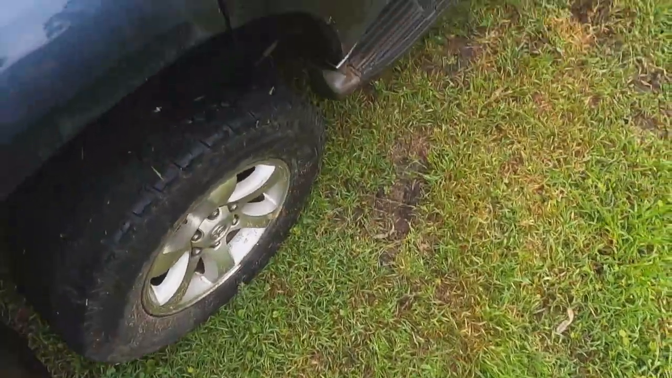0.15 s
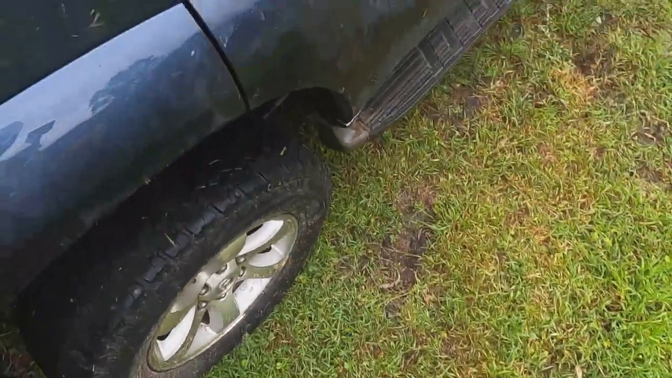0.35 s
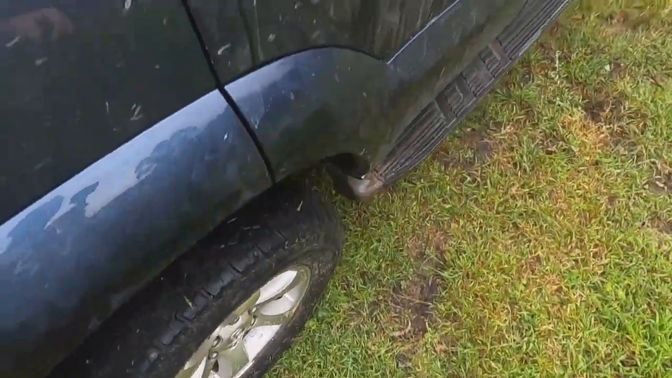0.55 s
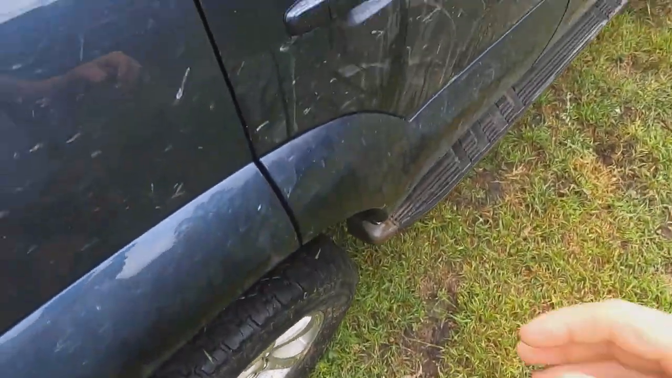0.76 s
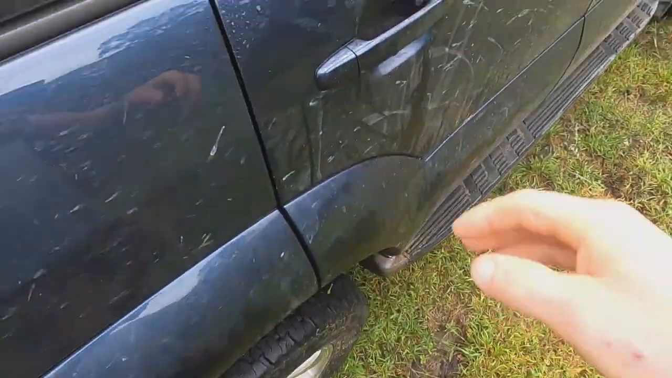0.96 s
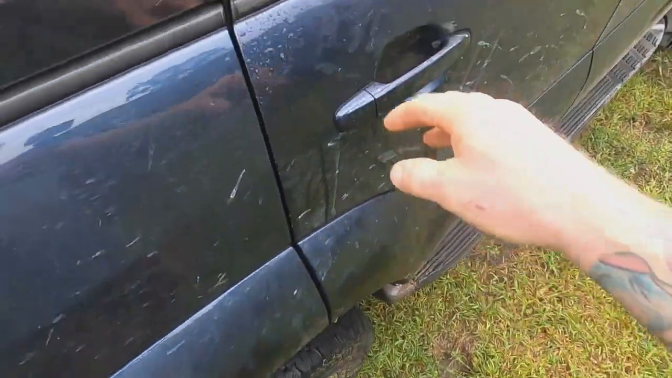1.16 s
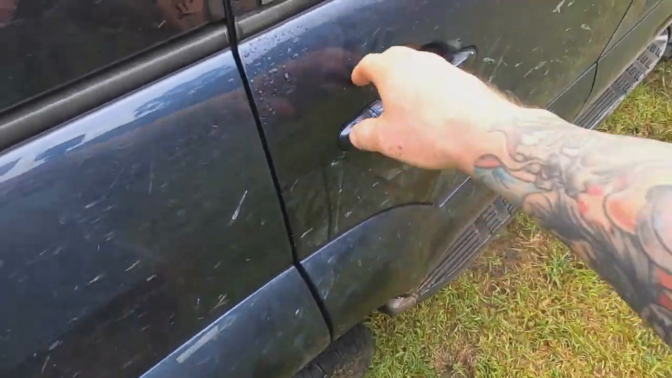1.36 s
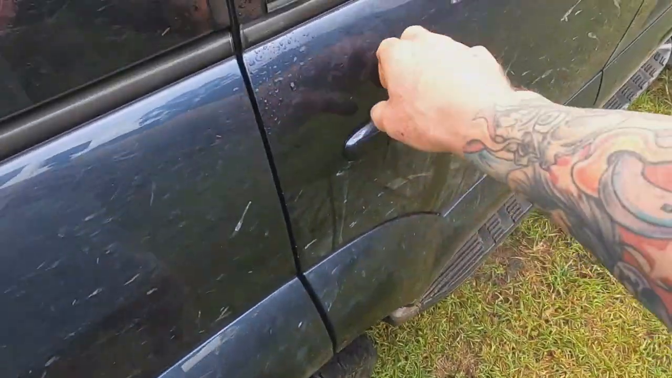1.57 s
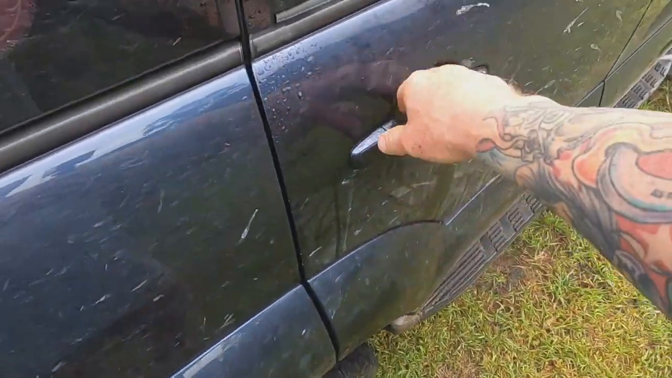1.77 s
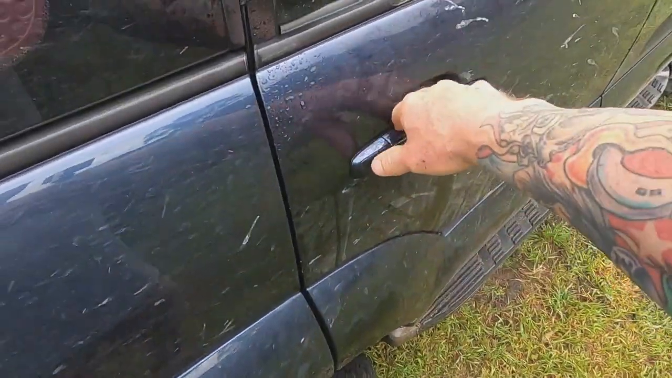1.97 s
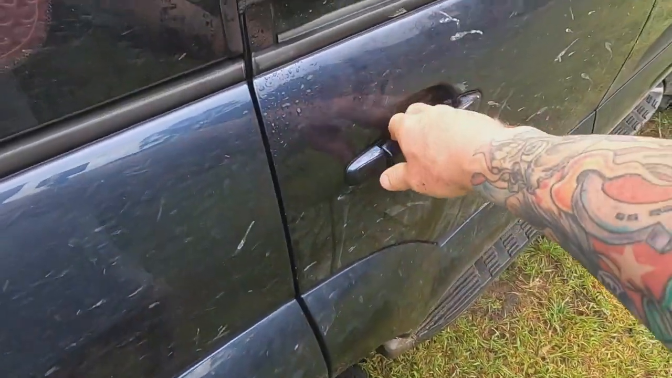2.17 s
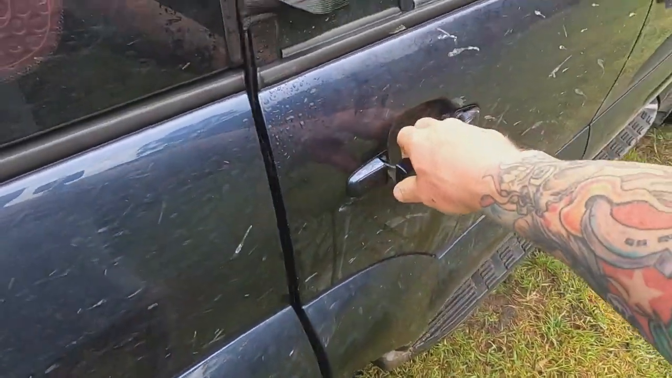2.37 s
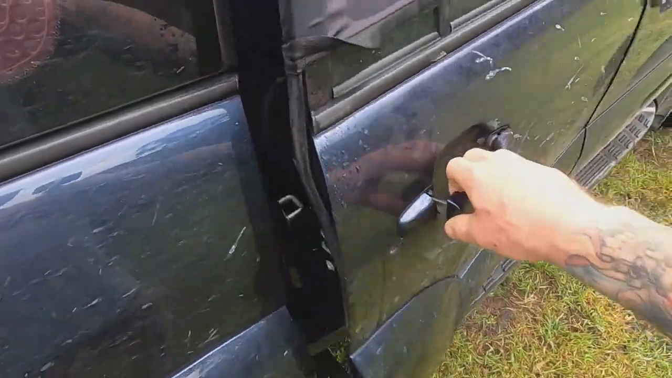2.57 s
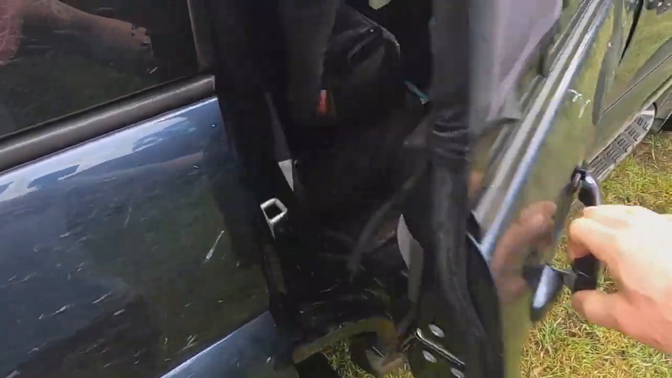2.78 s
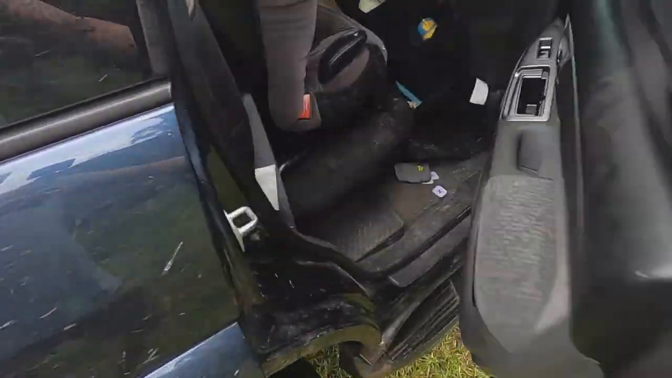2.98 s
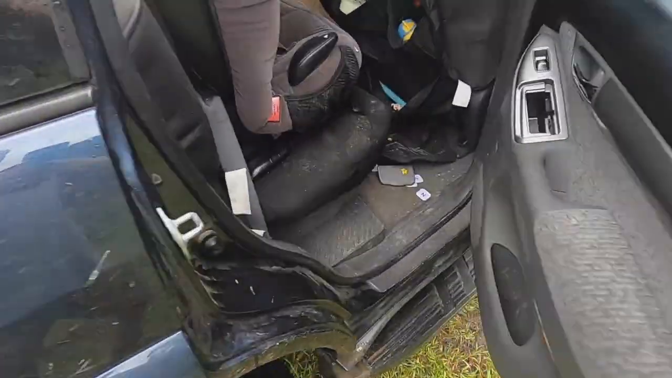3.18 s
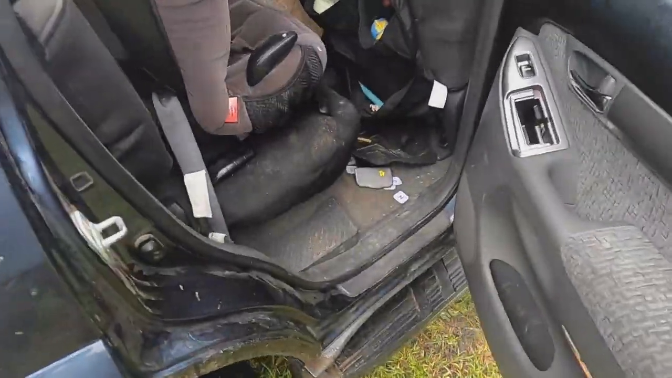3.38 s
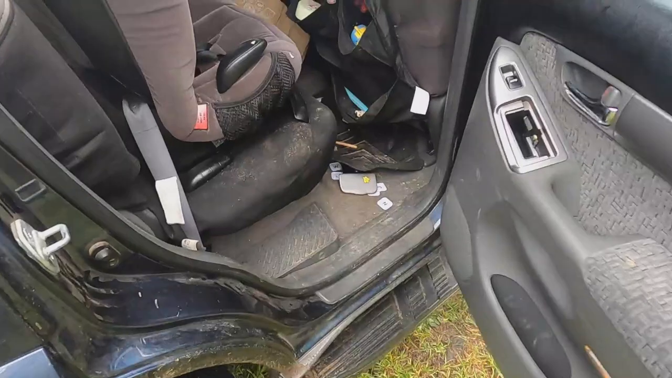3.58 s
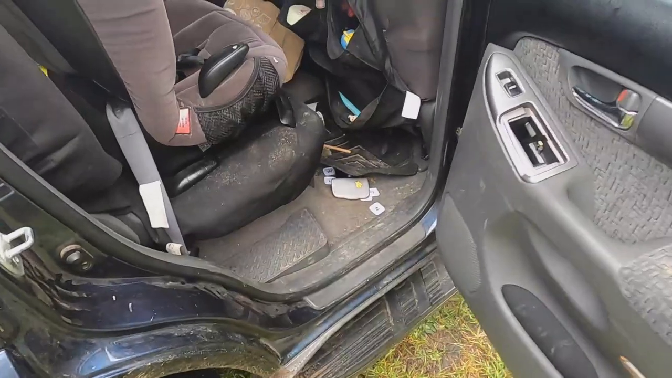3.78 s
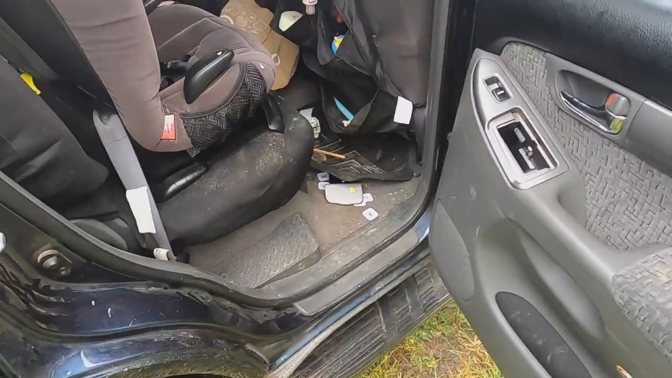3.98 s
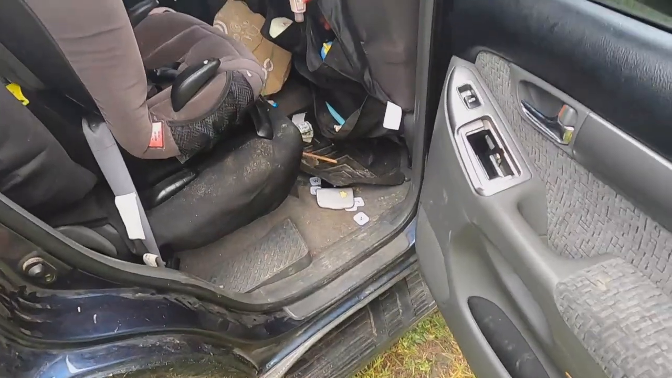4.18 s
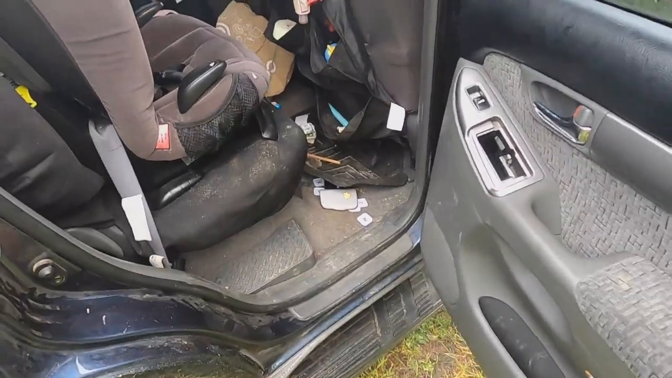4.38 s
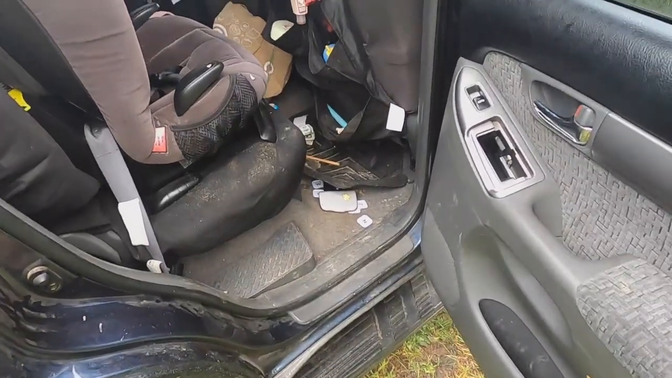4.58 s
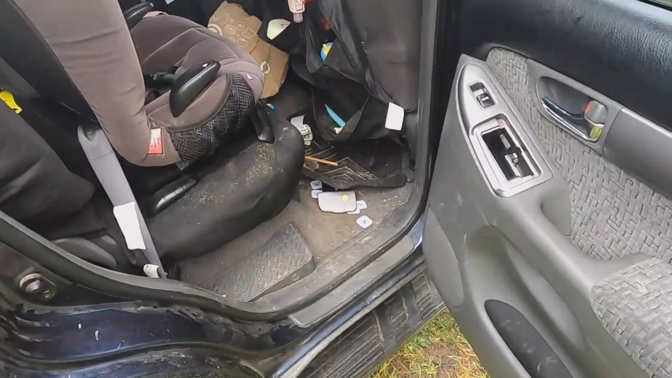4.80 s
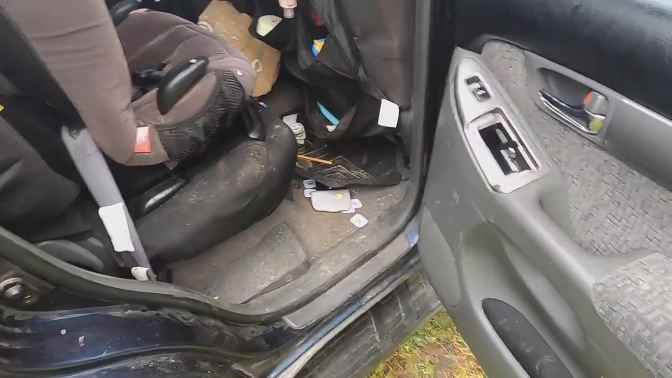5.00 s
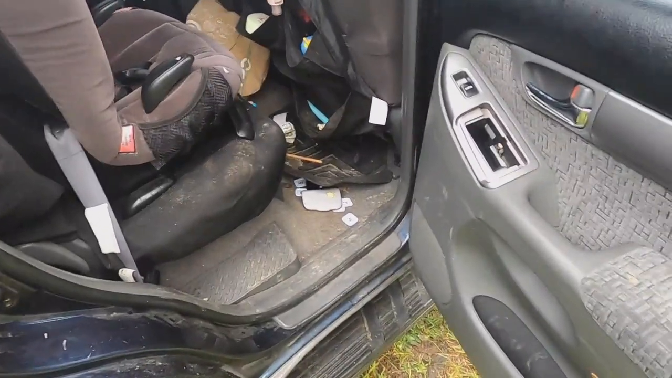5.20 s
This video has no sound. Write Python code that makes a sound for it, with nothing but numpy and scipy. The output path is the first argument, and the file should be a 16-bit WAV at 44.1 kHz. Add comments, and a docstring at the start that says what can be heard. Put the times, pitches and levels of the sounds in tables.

```python
"""A car's side door is opened on a lawn. After a few steps through grass a hand pulls the handle, the
latch lets go with a clunk that rings the steel skin and booms the cabin air, the handle clicks back
and the door swings, rubbing and groaning, into its stay. Two dull thuds in the car body follow.
Small birds chirp and whistle in gliding tones over a steady outdoor hiss."""
import sys
import numpy as np
from scipy import signal
from scipy.fft import rfft, irfft, next_fast_len
from scipy.io import wavfile
from scipy.ndimage import map_coordinates

SR = 44100
rng = np.random.default_rng(int(sys.argv[2]) if len(sys.argv) > 2 else 0)


def persist_wave(psi):
    """Save psi, clipped to +-1, as 16-bit WAV."""
    counts = np.round(np.clip(psi, -1, 1) * 32767).astype(np.int16)
    wavfile.write(sys.argv[1], SR, np.atleast_2d(counts).T)


N = 231418

# trim and linkage rattle (frequency [Hz], relative density [dB])
DOOR_RATTLE_SPECTRUM = [(60, -4.5), (150, 12), (300, 4), (530, -9), (800, 1.5), (1350, -1), (1600, -13.5),
                        (3100, -7.5), (3600, -24), (12000, -16.5)]


def door():
    """Latch release and soft bumps ring the steel skin and its cavity."""
    # skin and cavity (frequency [Hz], level [dB], t60 [s])
    modes = [(48.3, 4.5, 0.27), (86.7, -8, 0.42), (156, 1.5, 0.2), (195.4, 2, 0.1), (386.6, -12, 0.23),
             (452, -8.5, .26), (625, -5, 0.11), (668, -8, 0.2), (788, -5, .17), (825, -1, 0.09),
             (915, -13, .15), (953, -13.5, 0.2), (1170, -3, 0.065), (1443, -7, 0.09), (1757, -6, 0.06)]
    # latch slips its two catches (time [s], level [dB], high edge [Hz])
    catches = [(2.519, -21.5, 2200), (2.5444, -19.5, 2970)]
    # skin springs off the seal (time [s], level [dB], high edge [Hz])
    heaves = [(2.5146, -23, 228), (2.528, -17, 301)]
    # hand, then rocking in the stay (time [s], level [dB], low edge [Hz], high edge [Hz])
    bumps = [(1.567, -29, 56, 244), (2.886, -46.5, 130, 440), (3.252, -38.5, 90, 300),
             (3.285, -31.5, 75, 440), (3.38, -33.5, 70, 260), (3.432, -37.5, 30, 150),
             (3.578, -36.5, 35, 75.4)]
    # skin shudders (time [s], level [dB], low edge [Hz], high edge [Hz])
    shudder = (2.508, -29.5, 50, 224)
    catch_low_hz, heave_low_hz = 250, 108.3
    blows = [(s, db, catch_low_hz, high_hz) for s, db, high_hz in catches]
    blows += [(s, db, heave_low_hz, high_hz) for s, db, high_hz in heaves]
    blows += [(2.5755 + 0.0205 * k, -28.5 - 0.8 * k, 400, 850) for k in range(2)]  # freed latch chatters
    blows += [shudder] + soft_blows(bumps)
    return struck(blows, modes, DOOR_RATTLE_SPECTRUM,
                  rattle_db=-3.5, attack_s=0.001, contact_db=5, contact_s=0.008)


def struck(blows, modes, rattle_spectrum, rattle_db, attack_s, contact_db, contact_s):
    """Each blow rings modes and a dense rattle between its own low and high edges."""
    # panel rattle decay (frequency [Hz], t60 [s])
    panel_t60 = [(100, 0.29), (400, 0.16), (1000, 0.17), (3000, 0.1), (10000, 0.37)]
    out, t = np.zeros(N), np.arange(SR // 2) / SR
    for s, db, low_hz, high_hz in blows:
        ring = sum(amp(mode_db + rng.normal(0, 1) - 60 * t / t60_s) * np.sin(2 * np.pi * hz * t)
                   for hz, mode_db, t60_s in modes)
        band_hz, age_s, bands = signal.stft(noise(rattle_spectrum, size=len(t)), SR, nperseg=256)
        decay = amp(-60 * age_s / log_interp(panel_t60, band_hz)[:, None])
        rattle = signal.istft(bands * decay, SR, nperseg=256)[1][:len(t)]
        contact = 1 + amp(contact_db) * np.exp(-t / contact_s)  # loud until the blow spreads
        hit = (unit(ring) + amp(rattle_db) * unit(rattle)) * contact * (1 - np.exp(-t / attack_s))
        hit = butterworth(hit, low_hz, "highpass")
        hit = butterworth(hit, high_hz, "lowpass", order=3)
        add(out, s, amp(db) * hit / np.std(hit[:SR // 50]))  # level of the first 20 ms
    return out


def soft_blows(rows):
    """Each blow: a tick (stronger if hard), the thump, a lower settling beat (stronger if deep)."""
    tick_lead_s, tick_low_hz, tick_ratio, hard_hz = 0.0045, 523, 7.7, 510
    settle_lag_s, settle_ratio, deep_hz = 0.02098, 0.68, 86
    blows = []
    for s, db, low_hz, high_hz in rows:
        tick_db = -12 + 6.5 * np.log2(high_hz / hard_hz)
        settle_db = -4 + 9 * np.log2(deep_hz / max(low_hz, deep_hz))
        blows += [(s - tick_lead_s, db + tick_db, tick_low_hz, high_hz * tick_ratio),
                  (s, db, low_hz, high_hz),
                  (s + settle_lag_s, db + settle_db, low_hz * settle_ratio, high_hz * settle_ratio)]
    return blows


def cabin_boom():
    """The parting seal excites the cabin's lowest air resonance."""
    start_s, db, hz, rise_s, t60_s = 2.512, -5.5, 46.2, 0.013, 0.24
    out, t = np.zeros(N), np.arange(SR // 2) / SR
    envelope = amp(db - 60 * t / t60_s) * (1 - np.exp(-t / rise_s))
    add(out, start_s, envelope * np.sin(2 * np.pi * hz * t))
    return out


def handle():
    """The pulled handle knocks as it takes up its linkage."""
    # knocks (time [s], level [dB], centre [Hz])
    knocks = [(2.291, -29.5, 480), (2.301, -27.5, 300), (2.326, -34, 340), (2.341, -31, 640),
              (2.402, -38, 950), (2.412, -35, 200), (2.416, -37.5, 700)]
    # handle resonances (frequency [Hz], level [dB], t60 [s])
    modes = [(161.2, -9.5, 0.4), (260, 2.5, 0.08), (342.4, 1, 0.084), (398, -6.5, .12), (484, -5, 0.0896),
             (635, 0, 0.055), (690, -9.5, .12), (1120, -10, 0.068)]
    edge_ratio = 1.57
    blows = [(s, db, hz / edge_ratio, hz * edge_ratio) for s, db, hz in knocks]
    return struck(blows, modes, DOOR_RATTLE_SPECTRUM,
                  rattle_db=-8, attack_s=0.0014, contact_db=4, contact_s=0.0082)


def body_thuds():
    """Soft blows ring the cabin and its panels."""
    # blows (time [s], level [dB], low edge [Hz], high edge [Hz])
    thuds = [(4.0, -43.5, 65, 220), (4.321, -26, 71, 400), (4.486, -38.5, 200, 440),
             (4.525, -12.2, 160, 490)]
    # cabin and panels (frequency [Hz], level [dB], t60 [s])
    modes = [(87, -11, 0.42), (100.5, 0, 0.29), (166, -3, 0.24), (197.8, -5, 0.22), (236.8, -2.5, 0.26),
             (262.7, 6, 0.11), (310, -2.5, 0.093), (365, -13, 0.1), (482, -11, 0.16), (632, -4.5, 0.085),
             (813, -12, 0.12), (1010, -15.5, 0.1)]
    # body rattle (frequency [Hz], relative density [dB])
    rattle_spectrum = [(60, -6.5), (250, 5.5), (520, -9), (800, -9), (1400, -14), (2200, -15.5),
                       (3200, -37), (12000, -41)]
    return struck(soft_blows(thuds), modes, rattle_spectrum,
                  rattle_db=-4, attack_s=0.0017, contact_db=-1.5, contact_s=0.0069)


def clicks():
    """Steel parts of latch, sprung handle and stay snap against their stops."""
    # clicks and scrapes (time [s], level [dB], t60 [s], high edge [Hz])
    snaps = [(1.584, -44, .04, 1300), (2.291, -42, .059, 2600), (2.341, -42, 0.074, 2200),
             (2.403, -31, 0.062, 4400), (2.518, -34, 0.083, 5930), (2.5442, -21, 0.026, 3200),
             (2.614, -31, 0.03, 2000), (2.664, -23, 0.018, 7440), (2.724, -36, 0.036, 9940),
             (2.733, -33, 0.031, 9050), (2.747, -32.5, 0.04, 10800), (3.3, -44, 0.53, 2930),
             (3.361, -45, 0.097, 3050)]
    # steel (frequency [Hz], relative density [dB])
    spectrum = [(200, -1.5), (800, 7), (1250, 2), (1700, 5), (2900, 4.5), (3600, -1.5), (5800, -2),
                (7200, -14), (10000, -8.5), (15000, -25)]
    attack_s = 0.0013
    out, t = np.zeros(N), np.arange(SR // 4) / SR
    for s, db, t60_s, high_hz in snaps:
        snap = unit(butterworth(noise(spectrum, size=len(t)), high_hz, "lowpass"))
        add(out, s, snap * amp(db - 60 * t / t60_s) * (1 - np.exp(-t / attack_s)))
    return out


def hinge_rub():
    """Linkage and hinge rub unevenly as the door runs into its stay."""
    # friction (time [s], level [dB])
    levels = [(2.2, -90), (2.38, -46), (2.75, -48), (2.85, -55), (2.9, -45), (3.24, -43), (3.38, -43),
              (3.5, -52), (4.25, -55.5), (4.5, -43.5), (4.76, -93.5)]
    # hinge (frequency [Hz], relative density [dB])
    spectrum = [(53, -39.5), (90, -5.5), (162, 2.5), (204, -10.5), (276, -3.5), (355, -17), (415, -8.5),
                (561, -21), (855, -19), (1600, -22), (2600, -79.5)]
    return amp(curve(levels) + 0.76 * wobble(rate_hz=60)) * noise(spectrum)


def stay_groans():
    """The sliding stay drives a wavering resonance of the hollow door."""
    # groans (peak time [s], level [dB], 20 dB rise [s], 20 dB fall [s], pitch [Hz])
    groans = [(3.25, -47.5, .7, 0.23, 276.6), (3.394, -33.5, 0.077, 0.1, 264)]
    out = np.zeros(N)
    for s, db, rise_s, fall_s, pitch_hz in groans:
        hz = pitch_hz * (1 + 0.022 * wobble(rate_hz=77))
        tone = np.sin(2 * np.pi * np.cumsum(hz) / SR) * amp(4 * wobble(rate_hz=25))
        out += swell(s, db, rise_s, fall_s) * unit(tone)
    return out


def door_sway():
    """The door pushes air at each jolt."""
    # jolts (peak time [s], level [dB], 20 dB rise [s], 20 dB fall [s])
    jolts = [(2.58, -31, .06, 0.34), (3.44, -33.5, 0.42, 0.54), (3.98, -42, 0.28, .3),
             (4.38, -33, 0.064, 0.17)]
    # pushed air (frequency [Hz], relative density [dB])
    spectrum = [(12, 0.5), (25, 0.5), (45, -5.5), (65, -6.5), (110, -17), (220, -50), (500, -86)]
    return sum(swell(*jolt) for jolt in jolts) * noise(spectrum)


def rustle():
    """Shoes brush grass and clothing shifts."""
    # brushes (peak time [s], level [dB], 20 dB rise [s], 20 dB fall [s])
    brushes = [(.15, -54.5, 0.25, 0.9), (.56, -56.5, 0.4, .3), (.7, -51.5, 0.068, 0.1),
               (1.06, -56.5, 0.18, 0.54), (1.26, -47.5, 0.23, 0.071), (3.3, -57.5, 0.66, 0.26),
               (3.7, -62.5, 0.62, 1.5), (4.35, -57, 0.4, .18)]
    # grass and cloth (frequency [Hz], relative density [dB])
    spectrum = [(80, -13), (220, 4.5), (500, -1.5), (900, -5.5), (2000, 2), (5000, -5), (7500, -11.5),
                (10000, -14), (12500, -18.5), (15000, -28)]
    floor_db = -72
    envelope = np.max([swell(*brush) for brush in brushes], axis=0)
    crackle = unit(noise(spectrum) * amp(0.91 * wobble(rate_hz=370)))
    return np.maximum(amp(floor_db), envelope) * crackle


def bird_chirps():
    """Chirps fall at one mean rate, so longer ones drop further."""
    # chirps (time [s], length [s], start pitch [Hz], level [dB])
    chirps = [(-.008, 0.027, 4380, -43), (0.117, .024, 4350, -43), (0.256, 0.017, 4650, -45),
              (0.362, 0.016, 3890, -45), (0.394, 0.026, 3700, -41), (.497, 0.029, 3675, -44.5),
              (0.715, 0.027, 4114, -46), (0.904, 0.037, 3810, -45), (1.089, .035, 3700, -41.5),
              (1.278, 0.033, 3410, -45.5), (1.647, .018, 3040, -44), (1.759, 0.028, 4500, -50)]
    fall_hz_per_s, early_share = 53000, 0.38
    notes = []
    for s, length_s, hz, db in chirps:
        fall_hz = fall_hz_per_s * length_s
        notes.append((s, length_s, hz, hz - early_share * fall_hz, hz - fall_hz, db))
    return birdsong(notes, waver=0.12, echo_db=-2, near_t60_s=0.11, far_t60_s=0.85, far_gain=0.23)


def bird_whistles():
    """Whistles slide onto their pitch and bend partway back."""
    # whistles (time [s], length [s], pitch [Hz], level [dB], start offset [fraction of pitch])
    whistles = [(0.378, 0.017, 2990, -38.3, .06), (0.569, 0.03, 2614, -41.3, -.06),
                (1.119, 0.061, 1875, -51, 0.048), (1.616, 0.016, 2670, -47.5, -.02),
                (1.633, 0.017, 3010, -46, -.03), (2.005, 0.033, 2520, -52.5, 0.025),
                (3.555, .016, 4470, -60.5, .01), (4.033, 0.022, 4780, -61, .05),
                (4.067, 0.014, 5210, -58, 0.035), (4.308, 0.07, 5245, -53.5, .015),
                (4.4, .052, 5240, -62.5, .01), (4.572, .075, 5830, -57.5, 0.02),
                (4.668, 0.045, 4750, -57, 0.034), (4.856, 0.11, 5370, -56.5, .026),
                (4.983, 0.065, 5420, -56, .012)]
    return_share = 0.35
    notes = [(s, length_s, hz * (1 + slide), hz, hz * (1 + return_share * slide), db)
             for s, length_s, hz, db, slide in whistles]
    return birdsong(notes, waver=0.24, echo_db=-6.5, near_t60_s=0.16, far_t60_s=1.1, far_gain=0.4)


def birdsong(notes, waver, echo_db, near_t60_s, far_t60_s, far_gain):
    """Gliding, wavering sines, scattered back by cars and trees."""
    flutter_db, echoes_per_s = 3, 2500
    song = np.zeros(N)
    for s, length_s, start_hz, middle_hz, end_hz, db in notes:
        progress = np.linspace(0, 1, int(length_s * SR))
        glide = (progress + np.sin(np.pi * progress / 2) ** 2) / 2  # lingers at both ends
        hz = np.polyval(np.polyfit([0, 0.5, 1], [start_hz, middle_hz, end_hz], 2), glide)
        hz *= 1 + waver * np.ptp(hz) / middle_hz * wobble(rate_hz=295.5)[:len(hz)]
        envelope = amp(db) * np.sqrt(2) * np.sin(np.pi * progress) ** 0.85
        add(song, s, envelope * np.sin(2 * np.pi * np.cumsum(hz) / SR))
    song *= amp(flutter_db * wobble(rate_hz=200))
    t = np.arange(SR // 2) / SR
    echoes = rng.standard_normal(len(t)) * (rng.random(len(t)) < echoes_per_s / SR)
    tail = echoes * (amp(-60 * t / near_t60_s) + far_gain * amp(-60 * t / far_t60_s))
    return song + amp(echo_db) * signal.fftconvolve(song, tail / np.linalg.norm(tail))[:N]


def outdoor_hiss():
    """Steady far hiss, fuller and hollow near the car's reflecting flank."""
    # far hiss (frequency [Hz], relative density [dB])
    far_spectrum = [(15, -40.5), (25, 1.5), (90, -16), (176, -4), (811, -16.5), (1150, -8), (1390, -0.5),
                    (2020, -0.5), (2630, 2), (3440, -2.5), (5010, -16), (6040, -18), (12400, -38.5),
                    (15000, -47.5)]
    # far hiss (time [s], level [dB])
    far_levels = [(0.0, -55), (1.34, -52.5), (5.25, -54.5)]
    # flank reflection (frequency [Hz], relative density [dB])
    flank_spectrum = [(90, -20), (170, 9), (300, -5), (450, 7.5), (880, -11), (1400, -4.5), (2000, -2),
                      (2400, 5.5), (3700, -12.5), (4400, -1.5), (5400, -15.5), (5800, -9), (6800, -20),
                      (7900, -15), (10000, -48)]
    # flank reflection (time [s], level [dB])
    flank_levels = [(0, -69), (1.1, -79.5), (1.55, -52), (1.9, -52.5), (2.3, -55), (2.8, -66), (3.3, -77.5),
                    (5.25, -69)]
    far = amp(curve(far_levels) + 1.07 * wobble(rate_hz=4.016)) * noise(far_spectrum)
    return far + amp(curve(flank_levels)) * noise(flank_spectrum)


def amp(db):
    """Decibels to gain."""
    return 10 ** (np.asarray(db) / 20)


def unit(x):
    """Scale to rms 1."""
    return x / np.sqrt(np.mean(x ** 2) + 1e-20)


def log_interp(points, hz):
    """Read (frequency [Hz], value) points on a log axis."""
    knot_hz, values = np.transpose(points)
    return np.interp(np.log(hz + 1), np.log(knot_hz + 1), values)


def curve(points):
    """Read (time [s], value) points at every sample."""
    return np.interp(np.arange(N) / SR, *np.transpose(points))


def swell(peak_s, db, rise_s, fall_s):
    """Peaked gain: up 20 dB per rise_s, down 20 dB per fall_s."""
    t = np.arange(N) / SR - peak_s
    return amp(db - 20 * np.maximum(-t / rise_s, t / fall_s))


def wobble(rate_hz):
    """Smooth random curve, rate_hz knots a second."""
    knots = rng.standard_normal(int(N * rate_hz / SR) + 4)
    return map_coordinates(knots, [np.arange(N) * rate_hz / SR])


def noise(spectrum, size=N):
    """Coloured noise, rms 1."""
    n_fft = next_fast_len(size + 8192)
    gain = amp(log_interp(spectrum, np.fft.rfftfreq(n_fft, 1 / SR)))
    return unit(irfft(rfft(rng.standard_normal(n_fft)) * gain, n_fft)[:size])


def butterworth(x, hz, kind, order=2):
    """Causal low-pass or high-pass."""
    return signal.sosfilt(signal.butter(order, np.clip(hz, 5, 0.45 * SR), kind, fs=SR, output="sos"), x)


def add(track, start_s, x):
    """Mix x into track from start_s."""
    start = round(start_s * SR)
    x = x[max(-start, 0):N - start]
    track[max(start, 0):][:len(x)] += x


def scene():
    """Car and surroundings at one close microphone."""
    impacts = door() + cabin_boom() + handle() + body_thuds()
    birds = bird_chirps() + bird_whistles()
    movement = clicks() + hinge_rub() + stay_groans() + door_sway() + rustle()
    return (impacts + movement + birds + outdoor_hiss())[None]


def record(dry):
    """Brick-wall band limit."""
    top_hz = 15500
    n_fft = next_fast_len(N + 8192)
    passband = np.fft.rfftfreq(n_fft, 1 / SR) < top_hz
    return irfft(rfft(dry, n_fft) * passband, n_fft)[..., :N]


dry = scene()
out = record(dry)
persist_wave(out)
```